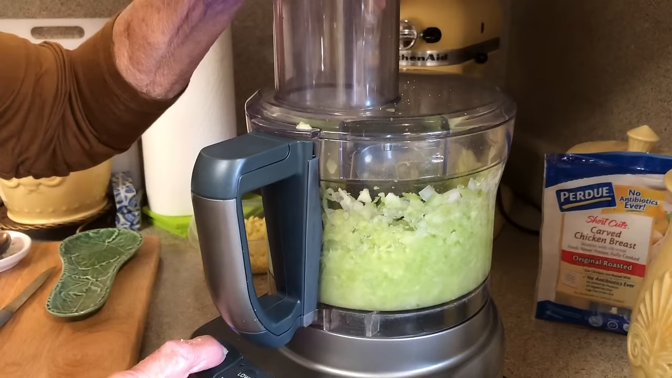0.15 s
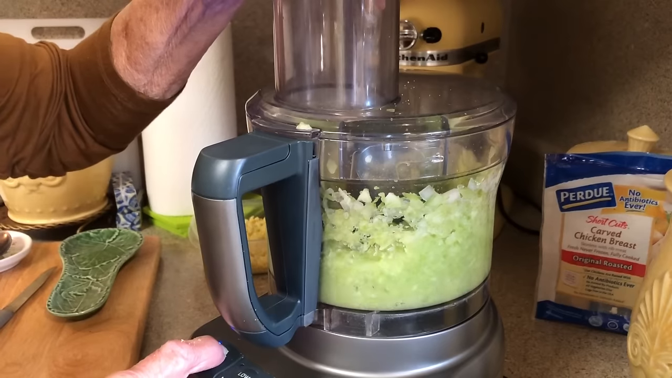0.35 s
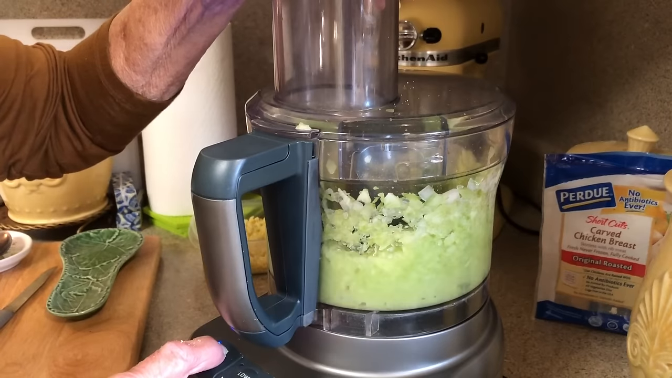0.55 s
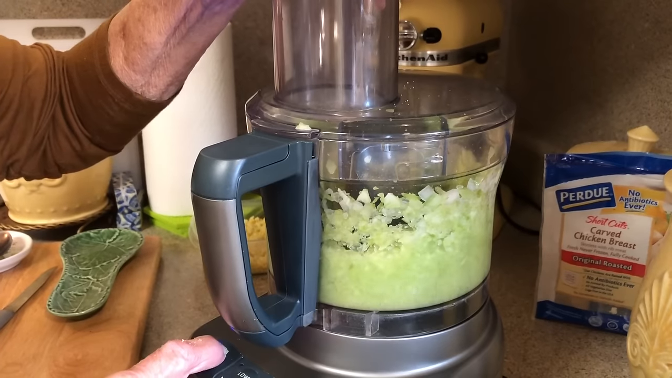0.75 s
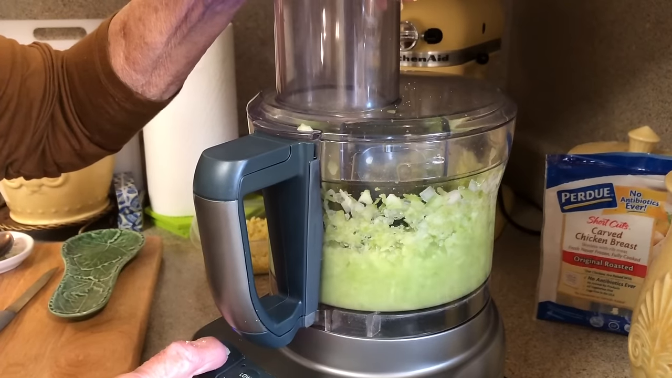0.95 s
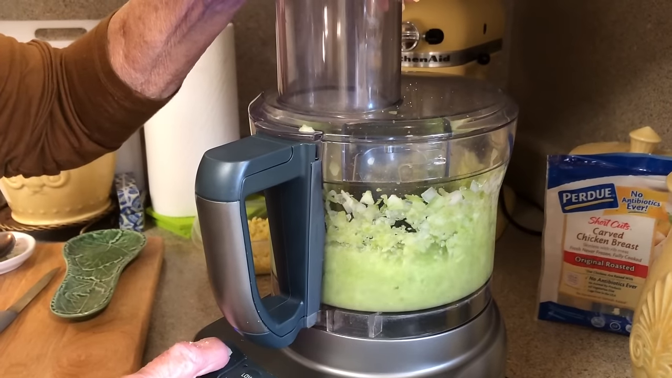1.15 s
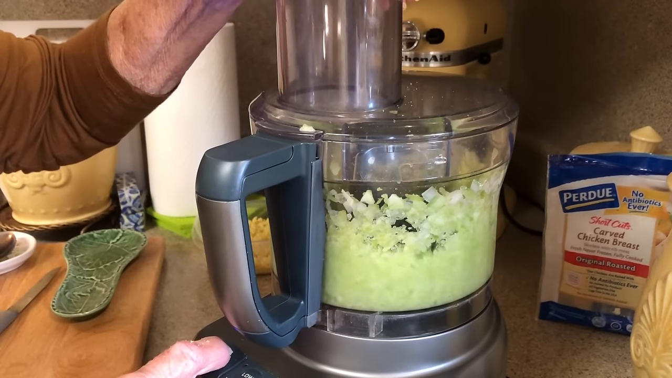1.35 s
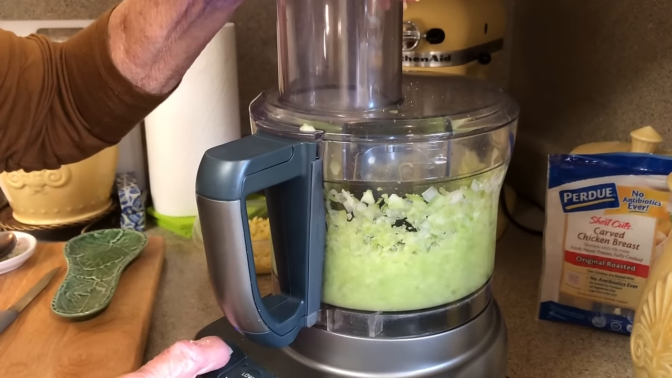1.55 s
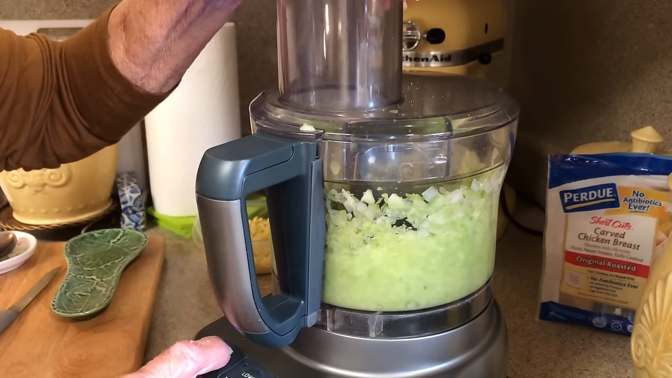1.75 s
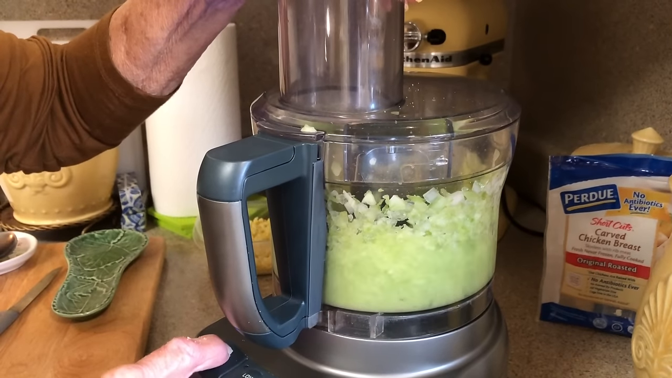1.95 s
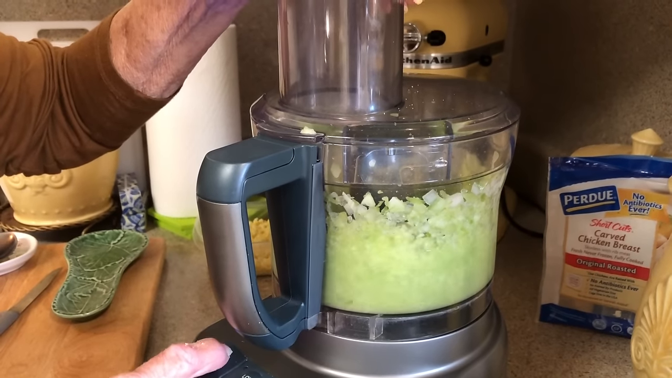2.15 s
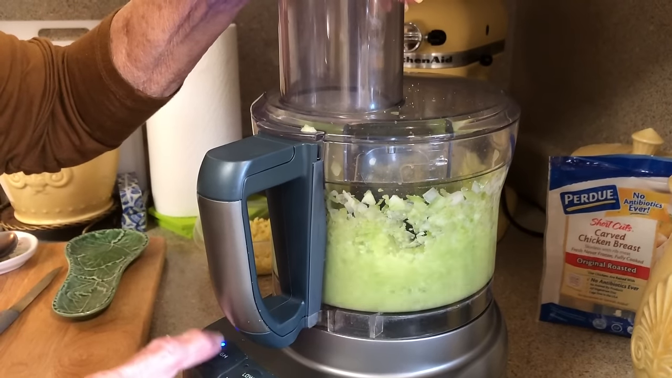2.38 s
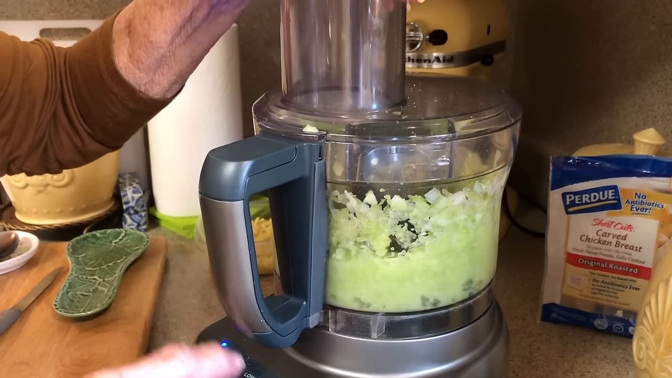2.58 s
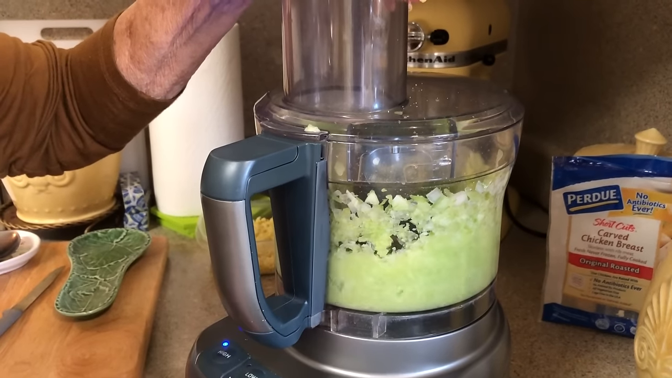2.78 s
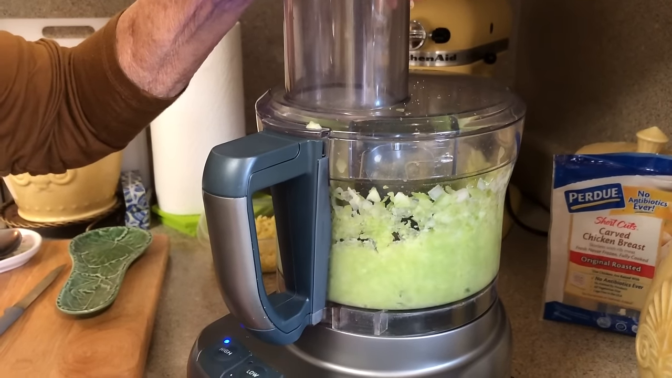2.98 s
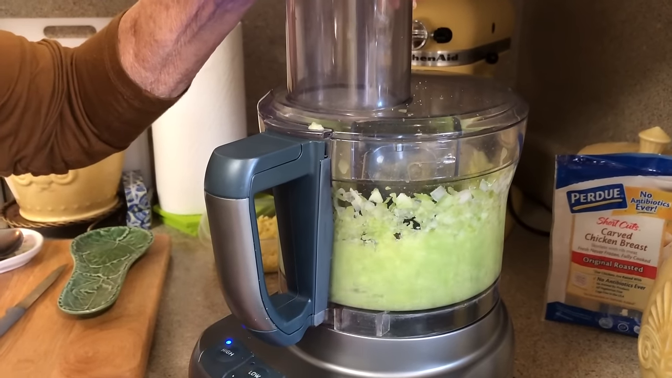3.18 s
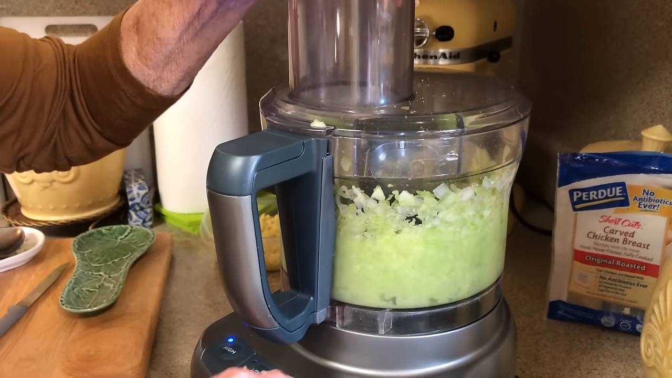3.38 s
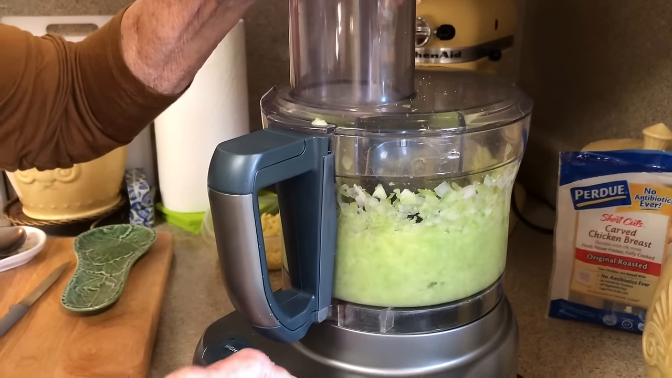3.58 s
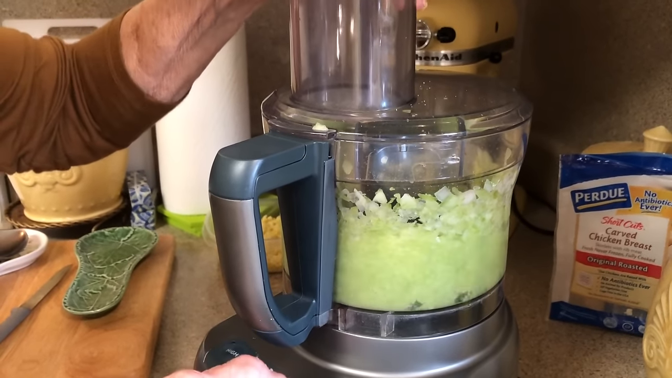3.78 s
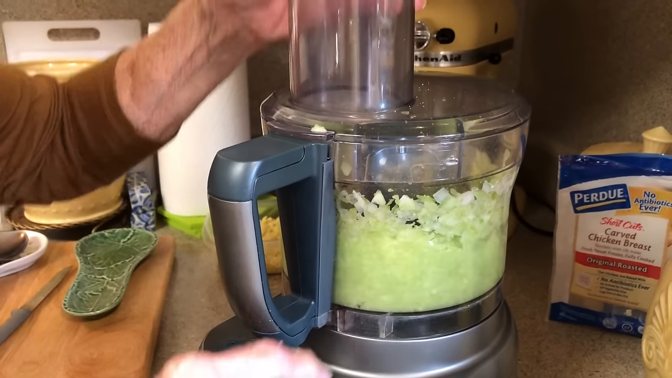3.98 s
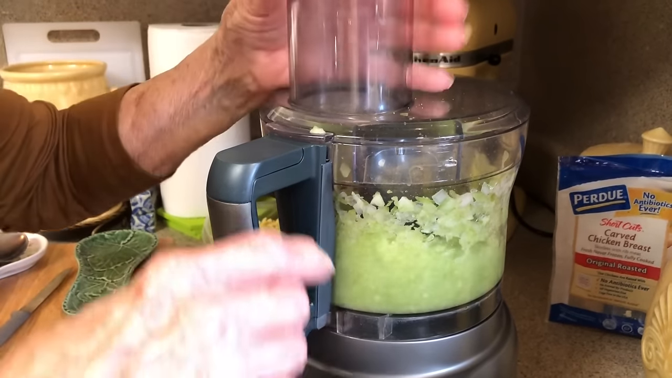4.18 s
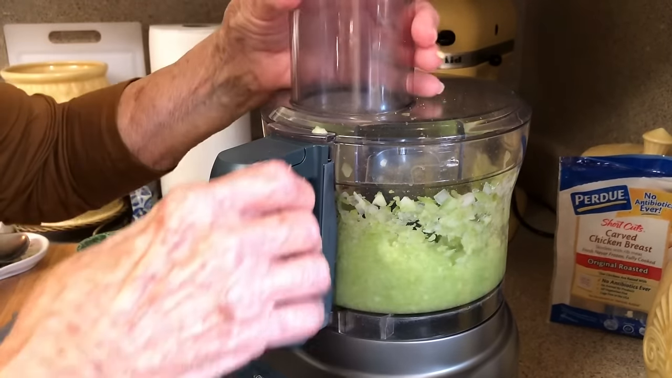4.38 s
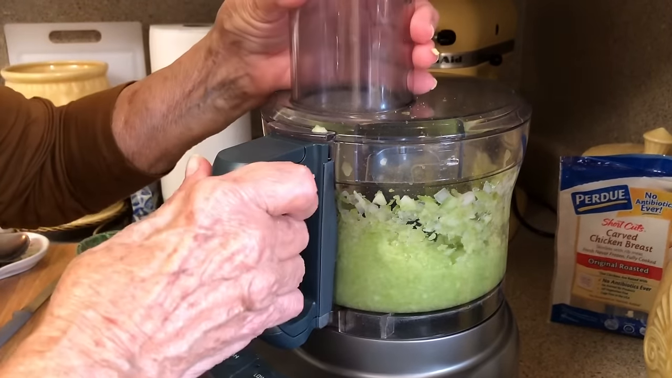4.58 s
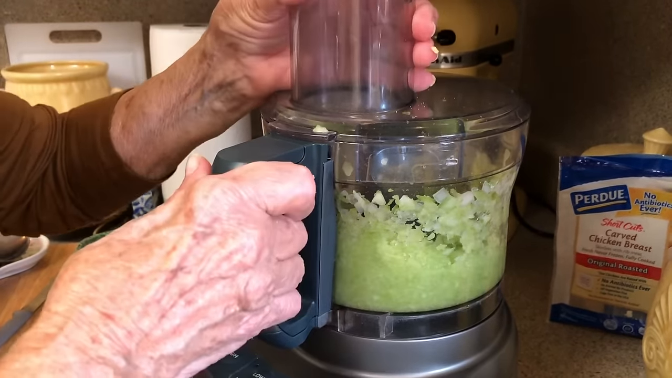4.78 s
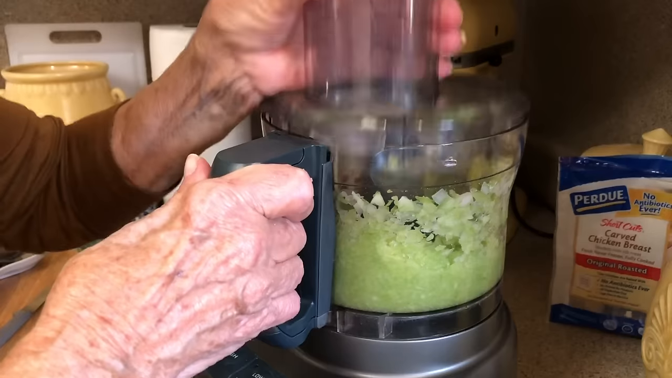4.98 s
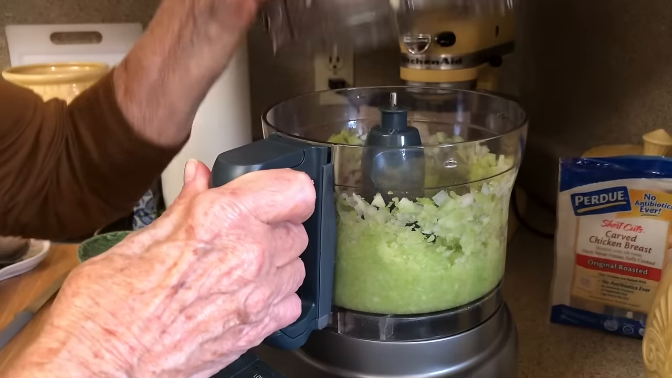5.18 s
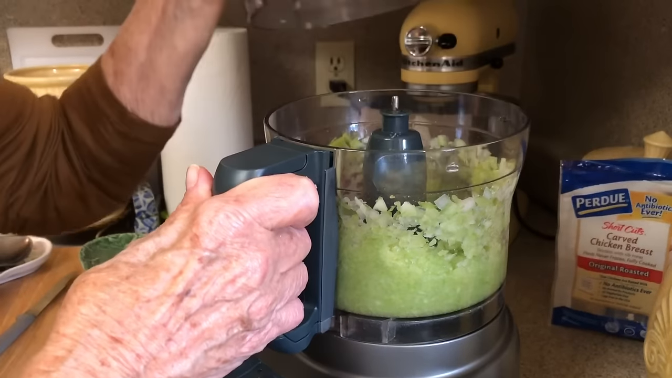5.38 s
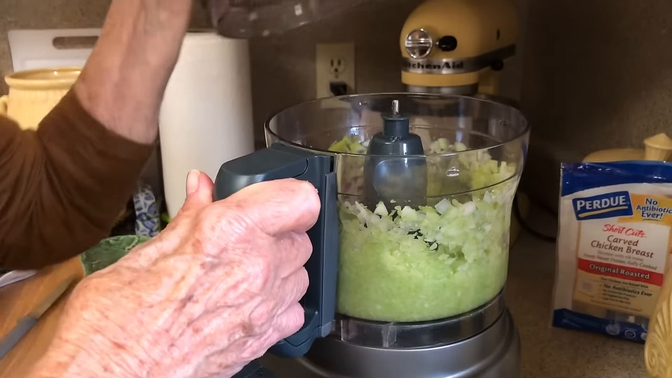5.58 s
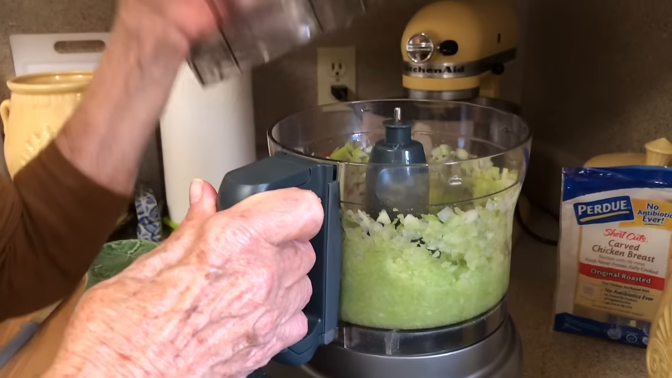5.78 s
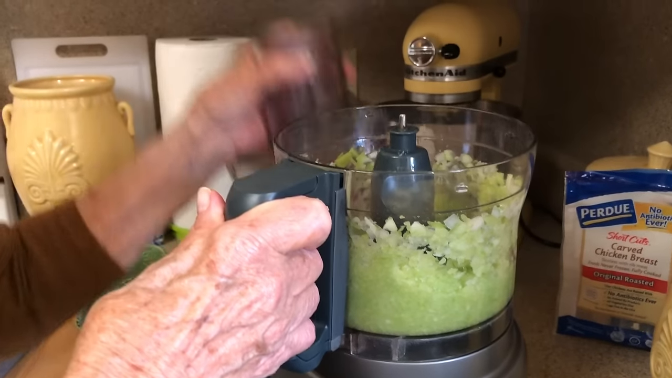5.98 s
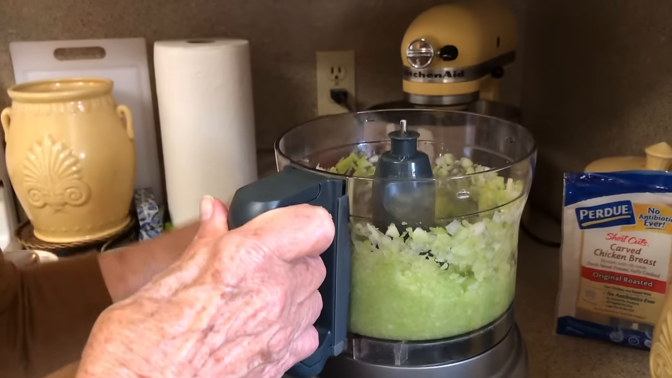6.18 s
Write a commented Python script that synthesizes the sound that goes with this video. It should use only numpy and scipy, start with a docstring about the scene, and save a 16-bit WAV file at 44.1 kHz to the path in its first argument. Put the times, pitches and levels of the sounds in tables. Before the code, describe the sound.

A food processor grinds loudly with a piercing whine, clacks off and coasts down, then its plastic lid is twisted free with sharp clicks.

```python
"""In a small kitchen with a faint appliance hum, a food processor chops vegetables on the counter.
Gear and food hits are noise puffs through the housing's resonances; hum and whine are tones locked to the motor.
The off button clacks and the motor coasts down, its tones sliding through those resonances.
The plastic lid is then twisted free, lifted off and knocked once: noise cracks plus decaying modes."""
import sys
import numpy as np
from scipy import signal
from scipy.fft import rfft, irfft
from scipy.io import wavfile

SR = 44100
rng = np.random.default_rng(int(sys.argv[2]) if len(sys.argv) > 2 else 0)


def store_pcm(level_fs):
    """Save levels as 16-bit WAV."""
    pcm = np.round(np.clip(level_fs, -1, 1) * 32767).astype(np.int16)
    wavfile.write(sys.argv[1], SR, np.atleast_2d(pcm).T)


N = 275619
TIME, HZ = np.arange(N) / SR, np.fft.rfftfreq(N, 1 / SR)
FULL_SPEED_HZ, OFF_S = 338, 3.5
EDGE_HZ = 15950  # upper band limit


def amp(db):
    """Decibels to gain."""
    return 10 ** (np.asarray(db) / 20)


def unit(x):
    """Scales to rms 1."""
    return x / np.sqrt(np.mean(x ** 2) + 1e-20)


def read(points, hz):
    """Interpolates a (frequency, value) table on a log-frequency axis."""
    f, value = np.transpose(points)
    return np.interp(np.log(hz + 1), np.log(f + 1), value)


def colour(x, gain):
    """Filters by a gain for each frequency."""
    return irfft(rfft(x) * gain, len(x))


def noise(gain):
    """White noise filtered by a gain for each frequency, rms 1."""
    return unit(colour(rng.standard_normal(N), gain))


def drift(hz):
    """Random drift of rms 1, up to about hz."""
    return noise(1 / (1 + (HZ / hz) ** 4))


def decay(t, t60_s):
    """Exponential fall of 60 dB in t60_s."""
    return np.exp(-np.log(1000) * t / t60_s)


def puffs_from(impulses, decay_s):
    """Turns each impulse into an exponential puff."""
    return signal.lfilter([1], [1, -np.exp(-1 / (decay_s * SR))], impulses)


def dying(pace, stall):
    """Gain that falls away steeply once the pace drops below stall."""
    return pace ** 4 / (pace ** 4 + stall ** 4)


def add(mix, s, sound):
    """Lays a sound into the mix at time s."""
    part = mix[round(s * SR):][:len(sound)]
    part += sound[:len(part)]


# spectrum of the still kitchen air: f/Hz, relative level/dB
AIR_SPECTRUM = [(20, -35.5), (55, -9.5), (100, -12.5), (200, -14.5), (300, -15), (600, -25.5), (1300, -32),
                (2500, -37.5), (6000, -41.5), (16000, -45)]
# appliance hum tones: f/Hz, rms level/dB
HUM_TONES = [(59.2, -66), (188.4, -59.5), (1249, -87), (1427, -77)]


def background(air_db=-60):
    """Still air as shaped noise, appliance hum as steady sines."""
    air = amp(air_db) * noise(amp(read(AIR_SPECTRUM, HZ)))
    hum = sum(amp(db) * np.sin(2 * np.pi * (hz * TIME + rng.random())) for hz, db in HUM_TONES)
    return air + np.sqrt(2) * hum


# reverberation time of the kitchen: f/Hz, t60/s
ROOM_DECAY = [(150, 0.3), (500, 0.48), (1500, 0.34), (3700, 0.36), (9000, 0.3), (16000, 0.24)]


def kitchen(x, first_s=.005):
    """Dense reflections from counter and cupboards, each band dying at its own speed."""
    taps = rng.standard_normal(SR) * (TIME[:SR] > first_s)
    hz, t, bands = signal.stft(taps, SR, nperseg=256)
    bands *= decay(t, read(ROOM_DECAY, hz)[:, None])
    tail = signal.istft(bands, SR, nperseg=256)[1]
    return signal.fftconvolve(x, tail / np.linalg.norm(tail))[:N]


def handling(ticks_per_s=14, tick_db=-61, rub_db=-65, rub_hz=2510, rub_half_width_hz=70):
    """The lifted lid ticks faintly (bright noise puffs) and gives one soft squeak (narrow noise)."""
    held = (TIME > 5.2) & (TIME < 5.76)
    impulses = held * (rng.random(N) < ticks_per_s / SR) * rng.uniform(.4, 1, N)
    ticks = puffs_from(impulses, .004) * noise(HZ / (HZ + 4000))
    rub = noise(1 / (1 + ((HZ - rub_hz) / rub_half_width_hz) ** 4))
    stroke = np.exp(-((TIME - 5.79) / .045) ** 2)
    return amp(tick_db) * ticks + amp(rub_db) * rub * stroke


# modes of the plastic lid and bowl: f/Hz, relative level/dB, t60/s
LID_MODES = [(100, -4.5, 0.16), (205, -11.5, .16), (375, 0.5, 0.053), (469.5, -8.5, .12), (530, -4, 0.099),
             (708, -2.5, .12), (790, 0.5, .08), (872, -8, 0.27), (970, 2.5, 0.078), (1220, -9.5, .12),
             (1419, -6.5, .1), (1610, -8.5, .08), (2560, -10.5, 0.18), (3130, -24, .45)]
# spectrum of a crack in the plastic: f/Hz, relative level/dB
CRACK_SPECTRUM = [(60, -19.5), (200, -6), (700, 2), (1500, 2.5), (1900, 2.5), (2450, 4.5), (3100, -4),
                  (4200, -1.5), (6200, -6.5), (9000, -13.5), (15500, -22.5)]


def blow(crack_db, bright_db_per_octave, crack_t60_s, ring_db, ring_hz,
         spread_octaves=.26, leak=.12, snap=.43, rise_s=.0023):
    """A noise crack of plastic, plus the decaying modes that the point of contact favours."""
    t, hz = TIME[:SR // 2], np.fft.rfftfreq(SR // 2, 1 / SR)
    tint_db = read(CRACK_SPECTRUM, hz) + bright_db_per_octave * np.log2(np.maximum(hz, 500) / 2500)
    crack = unit(colour(rng.standard_normal(len(t)), amp(tint_db)))
    crack *= decay(t, crack_t60_s) * (1 + snap * np.exp(-t / .001))

    f, db, t60_s = np.transpose(LID_MODES)[:, :, None]
    octaves_off = np.log2(f / ring_hz)
    weight = amp(db) * (leak + np.exp(-(octaves_off / spread_octaves) ** 2))
    modes = weight * decay(t, t60_s) * np.sin(2 * np.pi * (f * t + rng.random(f.shape)))
    ring = modes.sum(0) / np.linalg.norm(weight) * (1 - np.exp(-t / rise_s))
    return amp(crack_db) * crack + amp(ring_db) * ring


def twist(start_s=4.835, length_s=.016, count=3):
    """The lid sticks and slips as its tabs leave their slots: a quick, uneven run of small blows."""
    out = np.zeros(N)
    for slip in (np.arange(count) + rng.random(count)) / count:
        slip_sound = blow(crack_db=-23, bright_db_per_octave=7, crack_t60_s=.065, ring_db=-23, ring_hz=1000)
        add(out, start_s + slip * length_s, slip_sound)
    return out


# button, latch and lid: t/s, crack level before decay/dB, crack brightness/(dB per octave), crack t60/s,
# ring level before decay/dB, favoured ring f/Hz
PLASTIC_BLOWS = [(3.499, -9, 2, 0.052, -17, 520), (4.63, -40, 3, .038, -44, 500),
                 (4.661, -31.5, 7.5, .04, -33.5, 505), (4.681, -47, -6, .04, -34.5, 180),
                 (4.807, -48, 1, 0.058, -34.5, 220), (4.83, -20, -1.5, 0.15, -33, 696),
                 (4.8636, -16, 9, 0.052, -21.5, 210), (4.910, -31.5, 6, 0.066, -34, 220),
                 (4.936, -35, -3, 0.059, -23, 1000), (4.958, -23, 6, .033, -28, 220),
                 (4.970, -27, 3, 0.041, -30.5, 510), (5.004, -31, -8, 0.037, -19, 403),
                 (5.012, -56, -5, .04, -27.5, 830), (5.558, -61, -1, .03, -51, 760),
                 (6.1334, -34.5, 0, 0.073, -30.5, 766)]


def button_and_lid():
    """Each contact of button, latch or lid strikes the plastic once."""
    out = np.zeros(N)
    for s, *settings in PLASTIC_BLOWS:
        add(out, s, blow(*settings))
    return out


# resonances of housing and bowl: f/Hz, width/Hz, height/dB
HOUSING_MODES = [(103, 20, 7.5), (160, 30, 3), (230.5, 98, 11.5), (406, 22, 2), (517.6, 111, 12),
                 (668, 12, 6), (741, 27, 8.5), (799, 55, 7.5), (929, 41, 8), (994.6, 96, 13.5),
                 (1274, 71, 7), (1329, 33, -4), (1477, 50, 5), (1615, 37, 10.5), (1820, 70, 2.5),
                 (2214, 330, 4), (2490, 90, 3.5), (3110, 80, 4.5), (3370, 40, 7), (3790, 150, 5.5),
                 (6070, 200, -1), (7280, 90, 7), (7530, 55, 2.5), (7800, 190, 6.5), (10660, 130, 3)]
# broad response under the resonances: f/Hz, level/dB
HOUSING_BROAD = [(30, -19), (50, -19.5), (85, -7.5), (170, -7.5), (325, -9.5), (620, -9.5), (1300, -2.5),
                 (2000, -2), (2450, -2), (3000, -3.5), (3700, -5.5), (4400, -8), (8000, -9.5),
                 (15500, -18.5)]


def housing_db(hz, contrast=1):
    """How strongly housing and bowl radiate each frequency: resonant peaks on a broad response."""
    peaks = sum(db / (1 + (2 * (hz - f) / width) ** 2) for f, width, db in HOUSING_MODES)
    return read(HOUSING_BROAD, hz) + contrast * peaks


# running motor, swayed by the load of the food: t/s, f/Hz (turns per second)
RUNNING_SPEED = [(0.0, 332.6), (0.22, 339.1), (0.45, 335.1), (0.78, 335.4), (1.08, 344.3), (1.33, 340.2),
                 (1.52, 340.2), (1.73, 336.2), (1.88, 338.4), (2.15, 335.1), (2.8, 332.9), (3.17, 341.5),
                 (3.5, 341.0)]


def motor_speed(friction_hz_per_s=234, drag_per_s=.5):
    """Turns per second; after off, dry friction takes a steady toll and food drag a share of the speed."""
    running = np.interp(TIME, *np.transpose(RUNNING_SPEED))
    coasted_s, offset_hz = np.maximum(TIME - OFF_S, 0), friction_hz_per_s / drag_per_s
    return np.maximum((running + offset_hz) * np.exp(-drag_per_s * coasted_s) - offset_hz, 0)


# rumble, clatter, swish: full-speed level/dB, loss per halving of speed/dB, stall/(share of full speed)
NOISE_BANDS = [(-33, 5, .005), (-17.7, 5, .03), (-25, 6.5, .1)]


def chopping(speed, hits_per_s=1800, hit_share=.4, sweep=.038, churn_db=.4,
             slow_contrast=1.26, slow_db=-3, slow_tilt_db_per_octave=-1, blade_ratio=.08):
    """Gear teeth and flying pieces strike the housing over the swish of the blade, which passes twice a turn."""
    pace = np.minimum(speed / FULL_SPEED_HZ, 1)
    running = TIME < OFF_S
    struck = rng.random(N) < pace * hits_per_s / SR
    hits = rng.uniform(.67, 1, N) * struck / np.maximum(pace, .1)
    puffs = puffs_from(hits, .0011)
    power = 1 - hit_share + hit_share * puffs / puffs[running].mean()
    drive = np.sqrt(power) * rng.standard_normal(N)
    blade_turns = np.cumsum(speed) * blade_ratio / SR
    passing = sweep * np.cos(2 * np.pi * 2 * blade_turns) + .067 * np.cos(2 * np.pi * blade_turns)
    drive *= (1 + passing) * amp(churn_db * drift(22))

    # as the speed falls, the duller and more hollow ring of the housing takes over
    fast = colour(drive, amp(housing_db(HZ)) * (HZ < EDGE_HZ))
    tilt_db = slow_tilt_db_per_octave * np.log2(np.clip(HZ, 500, 4000) / 1000)
    slow = colour(drive, amp(housing_db(HZ, slow_contrast) + slow_db + tilt_db))
    body = pace * fast + (1 - pace) * slow

    low, high = 1 / (1 + (HZ / 330) ** 12), 1 - 1 / (1 + (HZ / 4200) ** 12)
    out = np.zeros(N)
    for band, (db, halving_db, stall) in zip((low, 1 - low - high, high), NOISE_BANDS):
        layer = colour(body, band)
        level = amp(db + halving_db * np.log2(pace + 1e-9)) * dying(pace, stall)
        out += level * layer / layer[running].std()
    return out


BARS = 22  # commutator bars


def whine_level(speed, powered_db=-26, current_fade_s=.07, coast_db=-50, catch_db_per_halving=6.5,
                stall=.19, wall_echo_s=.003708, wall_echo_gain=.95):
    """Commutator whine in dB: swells on housing resonances, dips where the echo off the wall cancels it."""
    hz, pace = BARS * speed, speed / FULL_SPEED_HZ + 1e-3
    current = np.exp(-np.maximum(TIME - OFF_S, 0) / current_fade_s)
    # coasting: the brushes catch harder the slower the bars pass
    coasting = amp(coast_db - catch_db_per_halving * np.log2(pace))
    source = amp(powered_db) * current + coasting * (1 - current)
    echo = abs(1 + wall_echo_gain * np.exp(-2j * np.pi * hz * wall_echo_s))
    return housing_db(hz) + 20 * np.log10(source * echo * dying(pace, stall))


# blade, shaft and gear-mesh tones: f/(multiple of motor speed), full-speed level/dB, flutter/(0-1),
# fade exponent/(power of speed)
MOTOR_TONES = [(.16, -52, .3, 1.5), (.24, -45, .3, 2), (1, -44, .25, .9), (1.08, -40, .2, 4),
               (2, -34.5, .15, 2.5), (2.2, -43, .3, 2), (3, -27.5, .2, 4), (3.67, -40, .4, 2),
               (3.92, -39, .3, 2), (7.33, -38, .4, 2), (10, -41, .4, .6), (24, -46, .5, 1.5),
               (33, -53, .5, .5), (11, -38, .4, .1), (36, -45.5, .4, 2.2), (48, -43, .4, 2.4)]


def motor(speed, whine_db, flutter_hz=18, buzz_db=-44, mains_hz=60, stall=.18):
    """Tones locked to the shaft; as it slows they slide through the housing's resonances."""
    turning = speed > 3
    pace = speed / FULL_SPEED_HZ * turning
    # the slower the blade, the more the food jolts it
    jolts_hz = (.15 + 1.6 * (1 - pace) ** 2) * drift(70)
    turns = np.cumsum(speed + jolts_hz) / SR
    response_db = housing_db(HZ)
    shake = drift(flutter_hz) + 1j * drift(flutter_hz)
    # sliding tones swell and dip at random
    ripple, ripple_db = drift(25), 3.5 * np.clip(3 * (1 - pace), 0, 1)

    whine = np.sin(2 * np.pi * BARS * turns) * turning
    out = amp(whine_db + ripple_db * ripple) * (1 + .18 * shake.real) * whine
    # near rest the gears roll too gently to sing
    singing = dying(pace, stall)
    for multiple, db, flutter, power in MOTOR_TONES:
        full_speed_db = np.interp(multiple * FULL_SPEED_HZ, HZ, response_db)
        passing_db = np.interp(multiple * speed, HZ, response_db) - full_speed_db
        tone_ripple_db = ripple_db * np.roll(ripple, rng.integers(N))
        level = singing * pace ** power * amp(db + passing_db + tone_ripple_db)
        uneven = (1 + flutter * np.roll(shake, rng.integers(N))) / np.sqrt(1 + 2 * flutter ** 2)
        tone = np.exp(2j * np.pi * (multiple * turns + rng.random()))
        out += level * (uneven * tone).real
    # the windings buzz at twice the mains frequency while the current is on
    current = np.clip((OFF_S - TIME) * 50, 0, 1)
    out += amp(buzz_db) * np.sin(2 * np.pi * 2 * mains_hz * TIME) * current
    return np.sqrt(2) * out


def scene(machine_room_db=-14, blow_room_db=-14):
    """Machine and lid close by, the same in both channels; clatter and plastic also excite the room."""
    speed = motor_speed()
    plastic = handling() + twist() + button_and_lid()
    clatter = chopping(speed)
    tones = motor(speed, whine_level(speed))
    room = kitchen(amp(machine_room_db) * clatter + amp(blow_room_db) * plastic)
    mono = background() + room + plastic + clatter + tones
    return np.array([mono, mono])


def record(dry, low_cut_hz=48, ceiling=.8):
    """The microphone's bass roll-off, a soft ceiling on the sharpest peaks, and the band limit."""
    high_pass = signal.butter(3, low_cut_hz, "highpass", fs=SR, output="sos")
    thin = signal.sosfilt(high_pass, dry)
    held = thin / (1 + (thin / ceiling) ** 8) ** (1 / 8)
    low_pass = signal.firwin(511, EDGE_HZ, window=("kaiser", 9), fs=SR)
    return signal.oaconvolve(held, low_pass[None], "same", axes=1)


dry = scene()
out = record(dry)
store_pcm(out)
```